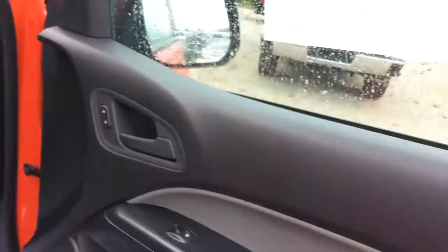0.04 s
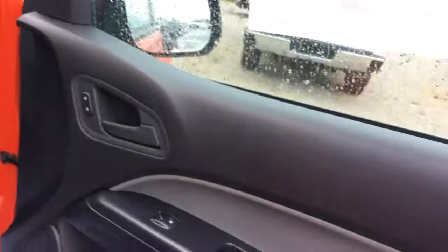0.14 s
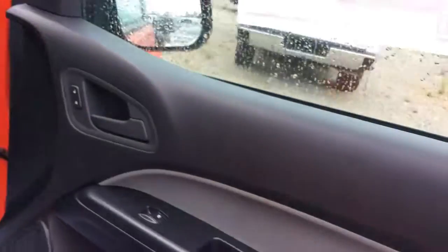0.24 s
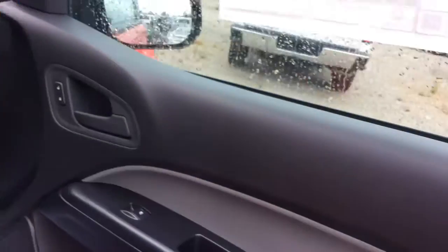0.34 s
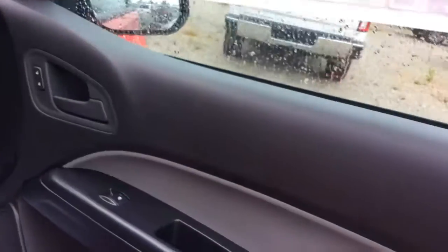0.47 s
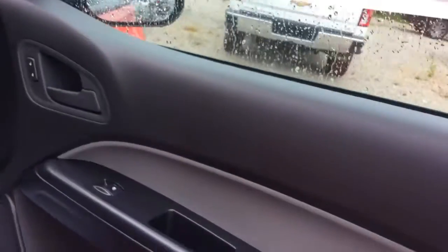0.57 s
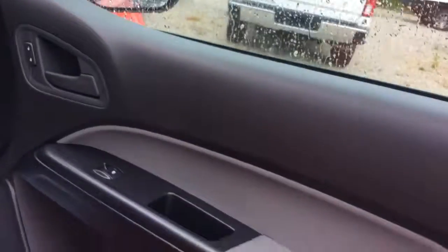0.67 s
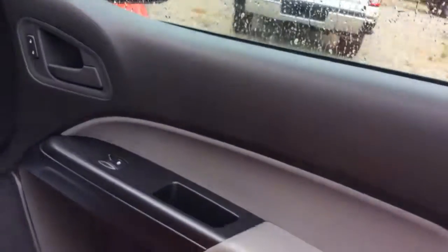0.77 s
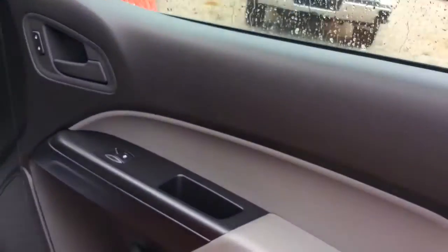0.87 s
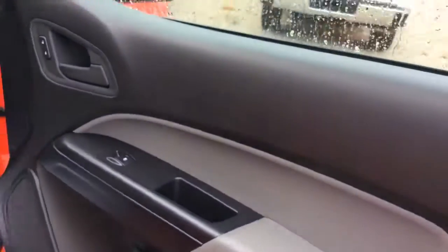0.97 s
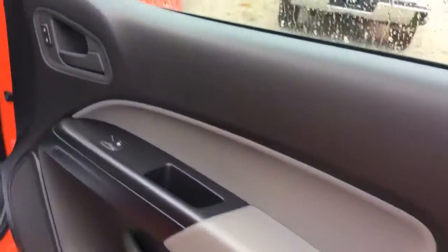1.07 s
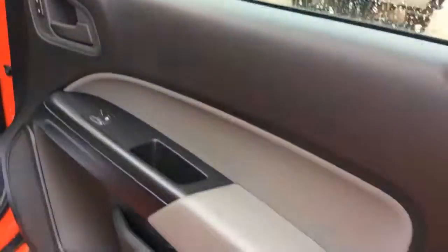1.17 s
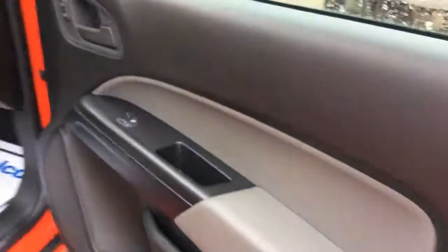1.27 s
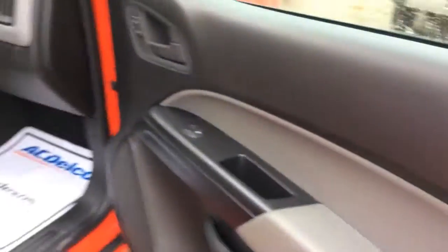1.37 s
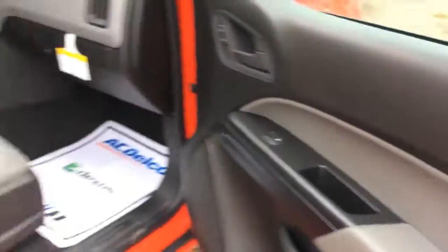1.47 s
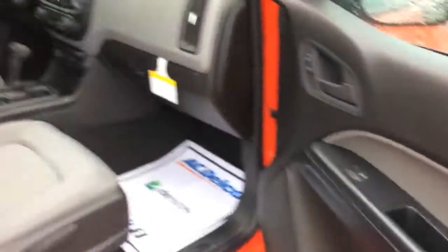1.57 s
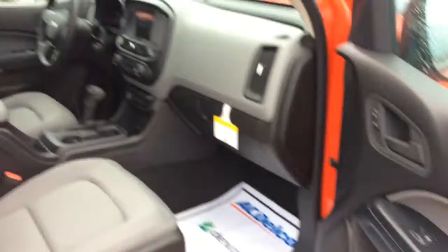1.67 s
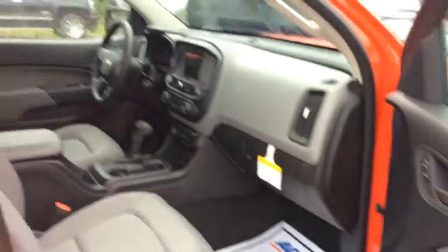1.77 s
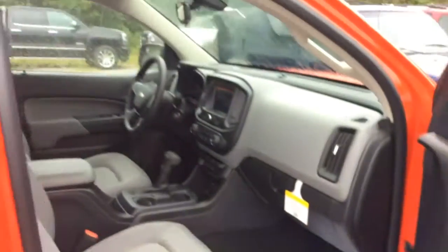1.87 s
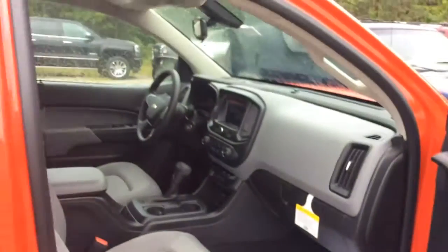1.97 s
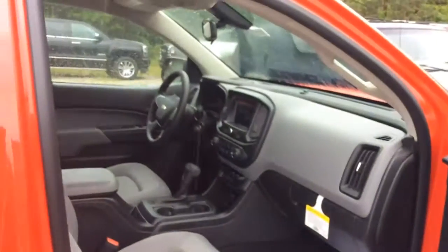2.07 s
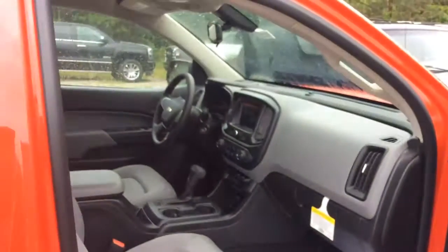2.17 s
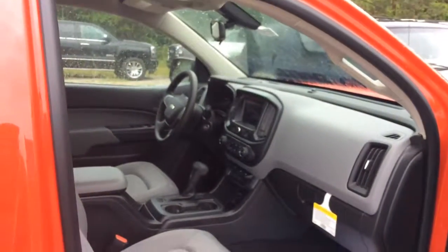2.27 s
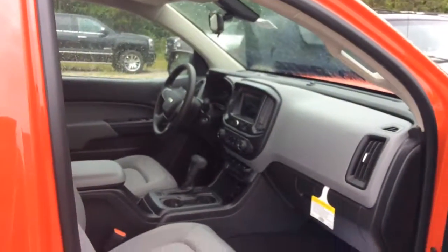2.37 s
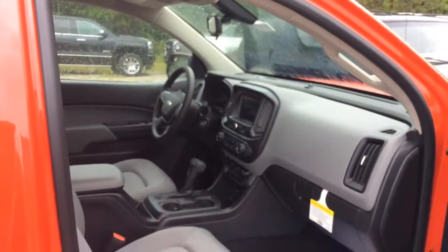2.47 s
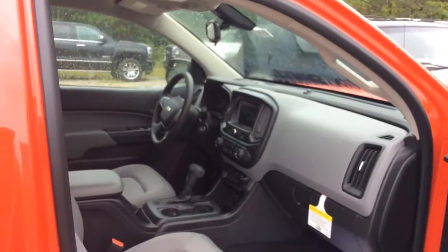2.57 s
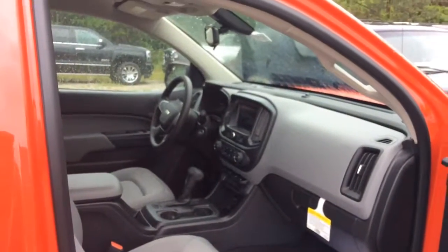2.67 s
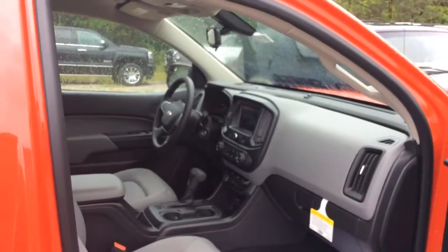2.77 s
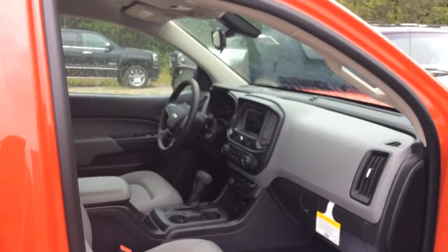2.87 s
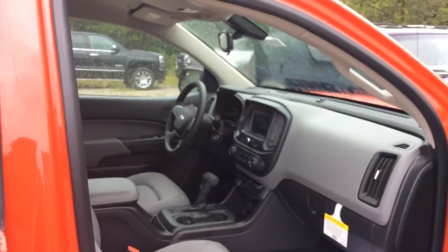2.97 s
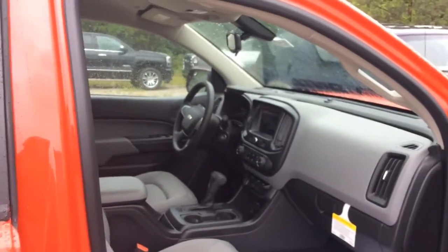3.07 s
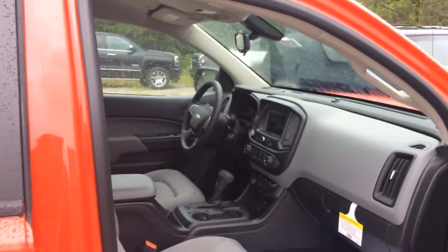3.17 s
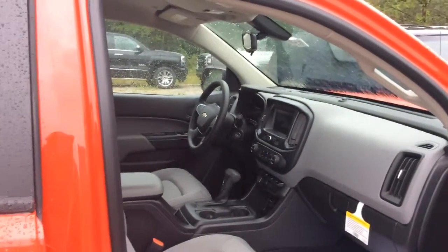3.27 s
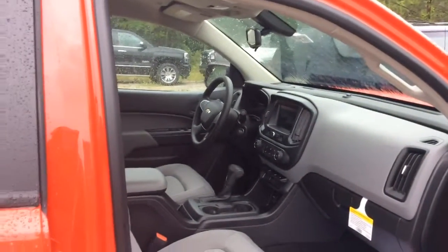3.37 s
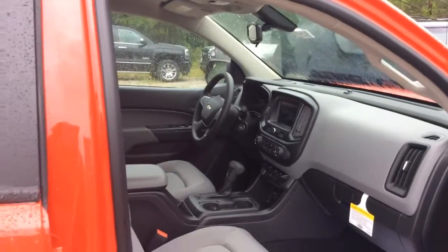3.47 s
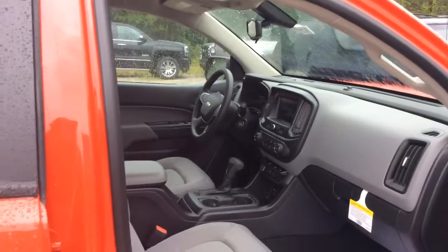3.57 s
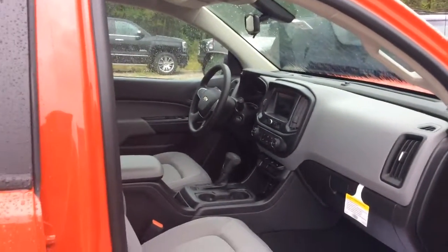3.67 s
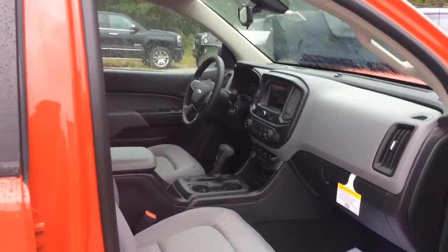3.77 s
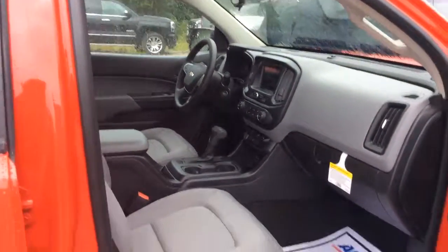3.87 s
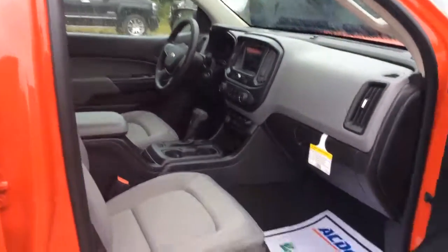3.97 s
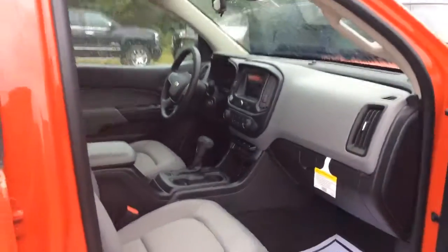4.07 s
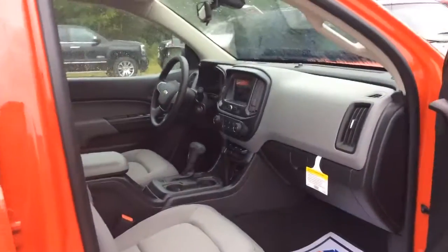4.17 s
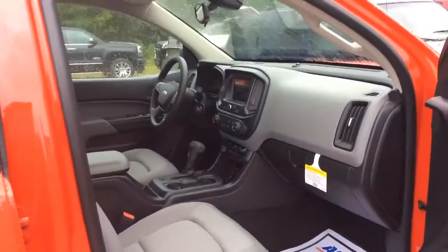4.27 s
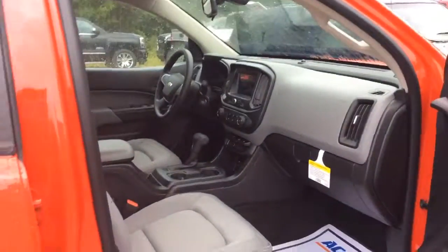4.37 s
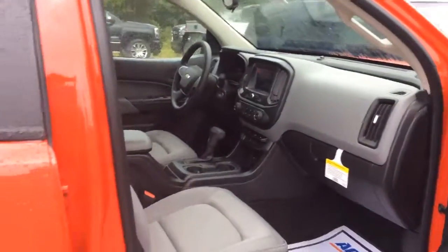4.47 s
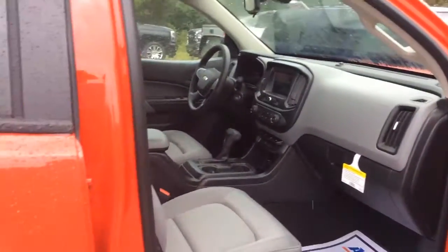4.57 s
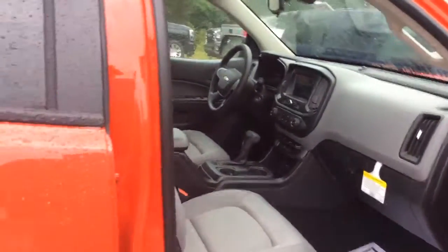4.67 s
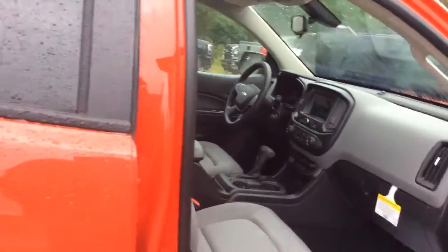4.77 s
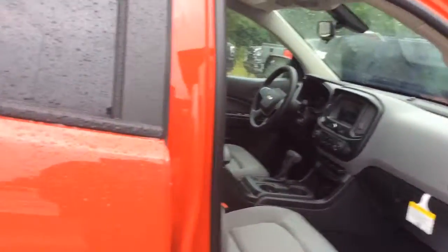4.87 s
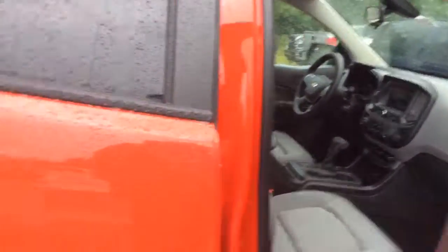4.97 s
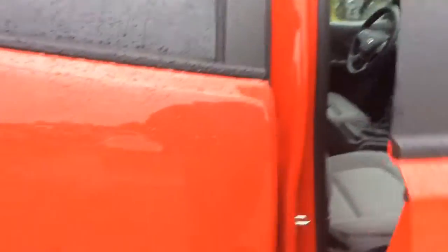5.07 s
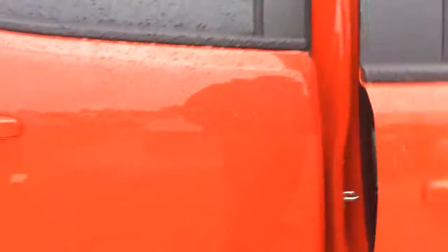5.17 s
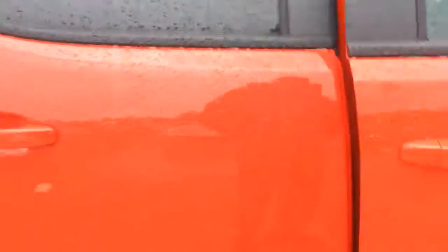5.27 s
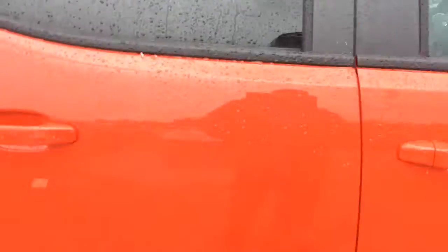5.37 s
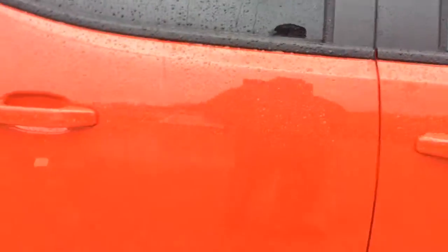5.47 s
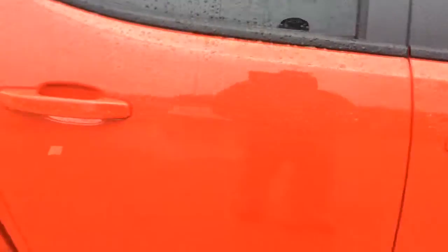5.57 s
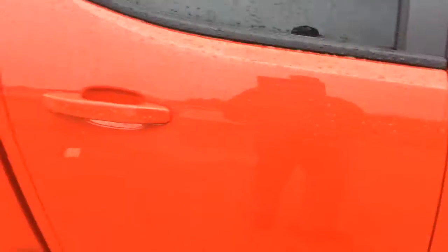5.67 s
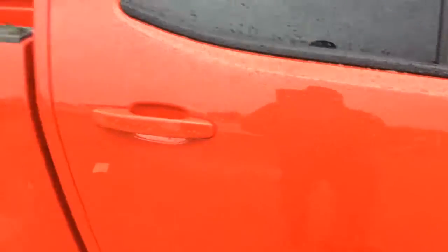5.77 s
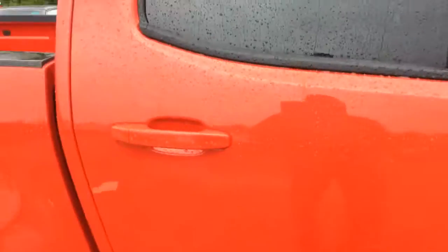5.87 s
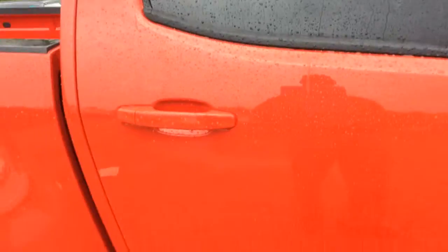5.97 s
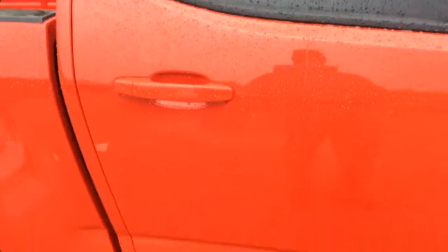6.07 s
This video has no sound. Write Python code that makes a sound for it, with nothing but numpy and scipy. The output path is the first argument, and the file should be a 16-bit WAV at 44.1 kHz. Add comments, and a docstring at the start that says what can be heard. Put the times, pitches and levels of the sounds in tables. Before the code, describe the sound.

Light rain hisses faintly outdoors and single drops tick on a pickup's body, over the low hum of distant engines. A jacket rustles near the microphone and a far bird whistles faintly. Then the open door swings: a short hinge creak, a soft knock and one wet rubber squeak. It slams shut close by with a deep thud, a steel latch snap and a brief rattle, far louder than everything else.

```python
"""A pickup's door is swung and slammed close by, in light rain.
The hinge sticks and slips, the door check knocks and wet rubber squeaks; then the door squeezes
out the air, hits its seal, latches and shudders, ringing its skin and rattling the trim.
Drops tick on the body and a jacket rustles over the low hum of far engines; a bird calls faintly."""
import sys
import numpy as np
from scipy import signal
from scipy.fft import rfft, irfft, next_fast_len
from scipy.io import wavfile

SR = 44100
rng = np.random.default_rng(int(sys.argv[2]) if len(sys.argv) > 2 else 0)


def transcribe(u):
    """Save the signal u as a 16-bit wav file named by the first command-line argument.

    u: samples, shape (n,) or (channels, n), limited to [-1, 1]; the rate is SR.
    q: integer samples, one column per channel.
    """
    v = np.clip(np.atleast_2d(u).T, -1, 1)
    q = np.round(v * 32767).astype(np.int16)
    wavfile.write(sys.argv[1], SR, q)


N = 270333
TIME = np.arange(N) / SR


def amp(db):
    return 10 ** (np.asarray(db) / 20)


def unit(x):
    """Scales to rms 1."""
    return x / np.sqrt(np.mean(x ** 2) + 1e-20)


def curve_at(points, hz):
    """Reads a curve on a log-frequency axis."""
    freqs, values = np.transpose(points)
    return np.interp(np.log(hz + 1), np.log(freqs + 1), values)


def fader(rows):
    """Gain over time from (time [s], level [dB]) rows."""
    return amp(np.interp(TIME, *np.transpose(rows)))


def add(mix, start, sound):
    """Mixes a sound in at a start time in seconds."""
    part = mix[max(round(start * SR), 0):][:len(sound)]
    part += sound[:len(part)]


def equalise(x, eq):
    """Filters by an EQ curve."""
    size = next_fast_len(len(x))
    gain = amp(curve_at(eq, np.fft.rfftfreq(size, 1 / SR)))
    return irfft(rfft(x, size) * gain, size)[:len(x)]


def noise(eq, size=N):
    """Coloured noise of rms 1."""
    return unit(equalise(rng.standard_normal(size), eq))


def wander(rate_hz):
    """Random modulation of rms 1."""
    knots = rng.standard_normal(N // 16)
    return unit(np.interp(TIME * rate_hz, np.arange(len(knots)), knots))


def resonate(x, hz, width):
    """A two-pole band-pass."""
    r = np.exp(-np.pi * width / SR)
    return signal.lfilter([1 - r, 0, r - 1], [1, -2 * r * np.cos(2 * np.pi * hz / SR), r * r], x)


def noise_band(hz, width, size=N):
    """Noise of rms 1 in a steep resonance."""
    return unit(resonate(resonate(rng.standard_normal(size), hz, 2 * width), hz, 2 * width))


def ring(modes, size=SR // 2):
    """A struck object: dying sines that start together."""
    t = np.arange(size) / SR
    return sum(amp(db - 60 * t / t60) * np.sin(2 * np.pi * hz * t) for hz, db, t60 in modes)


# engine rumble and tyre wash: (frequency [Hz], gain [dB])
RUMBLE_EQ = [(15, -18), (25, -5), (50, -2), (70, -3), (107, 2.5), (135, -4.5), (221, -6), (313, -9),
             (430, -10), (480, -14.5), (600, -17), (1000, -30.5)]
TYRE_EQ = [(200, -22), (550, -0.5), (1100, 2), (1700, -4.5), (2600, -14), (5000, -21)]
# their fader rides: (time [s], level [dB])
RUMBLE_FADER = [(0, -55), (1.7, -55), (2.5, -55.5), (3.5, -57), (4.2, -59.5), (4.7, -56), (5.3, -52),
                (6.13, -57.5)]
TYRE_FADER = [(0, -70), (1, -65.5), (2.1, -65.5), (2.8, -64.5), (3.6, -64), (4.5, -67.5), (5.55, -63.5),
              (5.75, -58.5), (6.13, -60.5)]
# engine drones: (pitch [Hz], width [Hz], level [dB], start [s], end [s])
DRONES = [(108.1, 12, -61, -0.5, 5.5), (154.7, 5.1, -60.5, 0.34, 1.405), (228, 14, -64.5, 2.05, 2.95),
          (266, 18.6, -66, 0, 6.13), (407.7, 24, -64.5, -1.5, 6.13)]

def traffic(fade_s=0.14):
    """Far engines drone in a bed of rumble and tyre noise."""
    out = fader(RUMBLE_FADER) * noise(RUMBLE_EQ) + fader(TYRE_FADER) * noise(TYRE_EQ)
    for hz, width, db, start, end in DRONES:
        fade = np.clip(1 + np.minimum(TIME - start, end - TIME) / fade_s, 0, 1)
        out += amp(db) * fade * noise_band(hz, width)
    return out


def idling_engine(firing_hz=105.2, level_db=-61, waver=0.02545, throb_db=2.0):
    """An engine idles some way off; its firing tone wavers and throbs."""
    cycles = np.cumsum(firing_hz * (1 + waver * wander(21))) / SR
    throb = amp(throb_db * wander(12))
    return amp(level_db) * unit(np.sin(2 * np.pi * cycles) * throb)


# bird call: (time [s], length [s], start pitch [Hz], end pitch [Hz], level [dB])
BIRD_NOTES = [(3.034, 0.12, 2580, 2730, -71), (3.26, 0.047, 2500, 3250, -70),
              (3.336, 0.1, 2450, 3050, -69.5), (3.545, .05, 2820, 3250, -69),
              (3.658, 0.063, 2800, 3050, -70)]

def bird(waver=0.035, flutter_db=3):
    """A far bird's thin rising whistles waver and flutter."""
    out = np.zeros(N)
    for start, length, start_hz, end_hz, db in BIRD_NOTES:
        progress = np.linspace(0, 1, round(length * SR))
        glide_hz = start_hz + (end_hz - start_hz) * np.sin(np.pi / 2 * progress)
        hz = glide_hz * (1 + waver * wander(198)[:len(progress)])
        whistle = np.sin(2 * np.pi * np.cumsum(hz) / SR)
        add(out, start, amp(db) * np.sin(np.pi * progress) * whistle)
    return out * amp(flutter_db * wander(80))


# far rain's hiss: (frequency [Hz], gain [dB]), and its level
RAIN_EQ, RAIN_DB = [(800, 8), (2500, 7.5), (7000, -4), (10000, -2.5), (15000, -8.5)], -71

def drizzle(drops_per_s=35, ticks_db=-73.5, size_db=4.0, width_hz=4500):
    """Tiny drops tick dryly at many pitches over the even hiss of far rain."""
    sizes = amp(size_db * np.minimum(rng.exponential(1, N), 4))
    impacts = sizes * (rng.random(N) < drops_per_s / SR)
    pitches = np.geomspace(6000, 13500, num=8)
    spot = rng.integers(0, len(pitches), N)
    ticks = sum(resonate(impacts * (spot == k), hz, width_hz) for k, hz in enumerate(pitches))
    return amp(ticks_db) * unit(ticks) + amp(RAIN_DB) * noise(RAIN_EQ)


# close drops: (time [s], level [dB], pitch [Hz], t60 [s], panel tap gain [dB])
DROPS = [(.543, -41.5, 3700, 0.054, -27), (.6385, -46.5, 7600, 0.027, -21), (0.776, -47, 2670, 0.03, -2),
         (.803, -52, 8700, 0.028, -29), (0.8728, -47, 5300, 0.043, -21), (1.051, -50, 11500, .03, -16),
         (1.2416, -46.5, 8360, 0.054, -6), (1.281, -44.5, 8400, 0.062, -18), (1.528, -54, 8500, .033, -6),
         (1.613, -43, 5100, .043, -4), (1.72, -46, 6250, 0.033, -1), (1.817, -47, 4030, .04, -1),
         (1.9435, -51, 3220, 0.048, -16), (1.9855, -54, 11000, .015, -20), (2.028, -52, 9500, 0.013, -20),
         (2.3225, -55, 10500, .012, -20), (2.476, -58.5, 8300, .05, 1), (3.429, -51.5, 8000, 0.042, -23),
         (3.5192, -49.5, 5700, 0.044, -19), (3.617, -46.5, 8440, 0.012, 0), (3.669, -48.5, 10200, .042, -5),
         (4.8435, -53, 7100, 0.045, 3.5), (6.0449, -38, 6900, 0.033, -7)]

def drops(width_share=0.15, splash_db=1, splash_t60=0.0077, tap_hz=1300, tap_width_hz=700):
    """Each near drop is a short splash, a bright ping and a duller tap of the panel under it."""
    out, t = np.zeros(N), np.arange(SR // 8) / SR
    for start, db, hz, t60, tap_db in DROPS:
        splash_noise, ping_noise, tap_noise = rng.standard_normal((3, len(t)))
        splash = splash_noise * amp(splash_db - 60 * t / splash_t60)
        ping = unit(resonate(ping_noise, hz, hz * width_share))
        tap = amp(tap_db) * unit(resonate(tap_noise, tap_hz, tap_width_hz))
        add(out, start, amp(db) * (splash + (ping + tap) * amp(-60 * t / t60)))
    return out


def strokes(rows, release_db_per_s):
    """Envelope of rubbing strokes: each rises, holds and dies away."""
    power = np.zeros(N)
    for start, length, db, attack in rows:
        rise = np.clip((TIME - start) / attack, 0, 1)
        release_db = release_db_per_s * np.maximum(TIME - start - length, 0)
        power += (rise * amp(db - release_db)) ** 2
    return np.sqrt(power)


# cloth rustle and sleeve swish: (frequency [Hz], gain [dB])
CLOTH_EQ = [(150, -4), (350, 4), (700, 3.5), (1200, -1.5), (2200, -4.5), (3800, -1), (5500, 0.5),
            (8000, -4), (11000, -8.5), (15000, -11)]
SLEEVE_EQ = [(500, 0.5), (1200, 1), (2500, -5), (5000, -3.5), (7500, 0), (9000, 1), (12000, -1),
             (15000, -2.5)]
# their cues: (time [s], length [s], level [dB], attack [s])
CLOTH_RUBS = [(0.247, .08, -55.5, .012), (0.32, .125, -52, .03), (0.868, .14, -52, .012),
              (1.1, .34, -59.5, .05), (1.437, .02, -53, .012), (1.606, .075, -48.5, .008),
              (1.74, .08, -63, .03), (4.95, .09, -57, .06), (5.1, .15, -67, .05), (5.65, .3, -58, .07),
              (5.98, .15, -63, .03)]
SLEEVE_SLIDES = [(3.62, .72, -60.5, .55), (4.42, .36, -50.3, .2), (4.98, .2, -66, .05),
                 (5.64, .17, -60, .14)]

def jacket(grain_db=2.2, catch_db=3.2, rest_db=-84):
    """Cloth rubs in fine grains and catches now and then; the sleeve slides smoothly."""
    grains = rng.standard_normal(N) * amp(grain_db * wander(900) + catch_db * wander(70))
    rubbing = np.hypot(strokes(CLOTH_RUBS, release_db_per_s=95), amp(rest_db))
    sliding = strokes(SLEEVE_SLIDES, release_db_per_s=130)
    return rubbing * unit(equalise(grains, CLOTH_EQ)) + sliding * noise(SLEEVE_EQ)


# scuff cues: (time [s], length [s], level [dB], centre [Hz], width [Hz])
SCUFFS = [(0.26, .21, -55.5, 650, 604), (0.328, 0.14, -47.5, 3700, 1490), (1.071, 0.037, -54.5, 1270, 220),
          (1.255, .05, -52, 1300, 278), (1.435, 0.038, -55, 1200, 885), (1.611, 0.08, -51, 443, 400),
          (4.02, 0.023, -55, 3830, 500), (4.013, .036, -44, 1520, 800), (4.594, .04, -54, 4530, 510),
          (4.667, 0.013, -53, 1800, 2500), (5.336, .014, -45, 1950, 400), (5.458, 0.025, -52, 4100, 2920),
          (5.66, 0.22, -61, 1210, 784), (5.821, 0.21, -56, 1200, 680), (6.025, .025, -51.5, 6240, 2200)]

def scuffs(grit_db=3):
    """Hand, shoe and door make brief gritty rubs, each through one resonance."""
    out = np.zeros(N)
    for start, length, db, hz, width in SCUFFS:
        arch = np.sin(np.linspace(0, np.pi, round(length * SR)))
        add(out, start, amp(db) * arch * noise_band(hz, width, len(arch)))
    return out * unit(amp(grit_db * wander(250)))


def cab_reflections(x, wet_db=-13, t60=0.093):
    """The open cab adds a short spray of reflections."""
    t = np.arange(SR // 5) / SR
    tail = rng.standard_normal(len(t)) * amp(-60 * t / t60) * (t > .003)
    return x + amp(wet_db) * signal.oaconvolve(x, tail / np.linalg.norm(tail))[:N]


def hinge_chatter(start=4.0, length=.052, slips_per_s=260, level_db=-44, jitter=.25, spread_db=3):
    """Weak slips at an uneven pace, as (time [s], level [dB]) rows."""
    chance = rng.standard_normal((round(length * slips_per_s), 2))
    return [(start + (k + jitter * late) / slips_per_s, level_db + spread_db * force)
            for k, (late, force) in enumerate(chance)]


# the creak's strong slips: (time [s], level [dB])
HINGE_SLIPS = [(3.9940, -35), (3.9983, -22.5), (4.0208, -32), (4.0237, -33), (4.0318, -31), (4.0387, -30),
               (4.0432, -29.5)]
# the hinge's ring: (frequency [Hz], gain [dB], t60 [s])
HINGE_MODES = [(433, -17, 0.035), (790, -14.5, 0.022), (1200, -17, 0.019), (1720, -15, .025),
               (3440, -21, 0.028), (6000, -30, 0.024)]

def hinge(scatter=0.11, pulse_hz=1300, pulse_s=.0005, attack_s=0.00026):
    """The hinge sticks and slips: each slip is one rounded pulse and a faint ring, never quite alike."""
    out, t = np.zeros(N), np.arange(SR // 10) / SR
    attack = 1 - np.exp(-t / attack_s)
    centred = t - t.mean()
    bell_curve = np.exp(-.5 * (centred / pulse_s) ** 2)
    for start, slip_db in HINGE_SLIPS + hinge_chatter():
        detune = 1 + scatter * rng.standard_normal(len(HINGE_MODES))
        modes = [(hz * ratio, db, t60) for (hz, db, t60), ratio in zip(HINGE_MODES, detune)]
        pulse = bell_curve * np.sin(2 * np.pi * pulse_hz * detune[0] * centred)
        add(out, start, amp(slip_db) * ring(modes, len(t)) * attack)
        add(out, start - t.mean(), amp(slip_db) * pulse)
    return out


# the squeak's tone: (harmonic [number], gain [dB])
SQUEAK_HARMONICS = [(1, 0.5), (2, -27), (3, -24.5), (4, -34)]

def rubber_squeak(start=4.7565, length=.0235, level_db=-22, start_hz=845, sag_hz_per_s=6500):
    """Wet rubber gives one falling chirp, which the cab returns twice."""
    out, t = np.zeros(N), np.arange(0, length, 1 / SR)
    phase = 2 * np.pi * np.cumsum(start_hz - sag_hz_per_s * t) / SR
    arch = np.sin(np.pi * t / length) ** 1.5
    chirp = arch * sum(amp(db) * np.sin(k * phase) for k, db in SQUEAK_HARMONICS)
    for delay_s, gain_db in [(0, 0), (.0175, -14), (.033, -22)]:
        add(out, start + delay_s, amp(level_db + gain_db) * chirp)
    return out


# whoosh ahead of the slam: (frequency [Hz], gain [dB])
AIR_EQ = [(30, -8), (70, -2), (250, -14), (480, 6), (750, -3), (1400, -8), (2100, -11.5), (3500, -21),
          (8000, -36), (15000, -42)]

def squeezed_air(shut_s=5.358, peak_db=-24.5, swell_s=.014, gap_power=2.4, cutoff_db_per_s=2000):
    """Air swells ever faster through the narrowing gap and is cut off by the seal."""
    gap = 1 + np.maximum(shut_s - TIME, 0) / swell_s
    cutoff_db = cutoff_db_per_s * np.maximum(TIME - shut_s, 0)
    return amp(peak_db - cutoff_db) / gap ** gap_power * noise(AIR_EQ)


# latch snaps: (time [s], level [dB], t60 [s])
LATCH_SNAPS = [(5.3609, -32, 0.033), (5.3640, -23, 0.035), (5.3718, -42, 0.06), (5.389, -43, 0.066)]
# their steely edge: (frequency [Hz], gain [dB])
STEEL_EQ = [(500, -20), (2000, -1), (4000, 2.5), (6500, -5), (9000, -2), (12000, -6.5), (15000, -12)]
# the latch's ring: (frequency [Hz], gain [dB], t60 [s])
LATCH_MODES = [(1240, -3, 0.084), (1903, -15, 0.084), (2064, 1.5, 0.069), (2190, -12, 0.076),
               (2370, -22, 0.11), (3250, -10, 0.078), (8780, -13, 0.11)]

def latch(ring_db=-4):
    """The steel latch snaps home: bright bursts, each with a metallic ring."""
    out, t = np.zeros(N), np.arange(SR // 2) / SR
    for start, db, t60 in LATCH_SNAPS:
        burst = amp(db - 60 * t / t60) * noise(STEEL_EQ, len(t))
        add(out, start, burst + amp(db + ring_db) * ring(LATCH_MODES))
    return out


# rattle of latch, glass and trim: (frequency [Hz], gain [dB])
CLATTER_EQ = [(60, -26), (300, 1), (700, -1), (950, -8), (1250, 1.5), (1600, -4.5), (2050, 0), (2800, -7),
              (4500, -20), (7000, -19.5), (10000, -18), (15000, -29)]
# its decay: (frequency [Hz], t60 [s])
CLATTER_DECAY = [(100, 0.26), (700, 0.16), (2000, 0.11), (5000, 0.13), (15000, 0.07)]

def clatter(size=SR // 3):
    """Countless loose parts ring after a blow; the treble dies first."""
    hz, t, spectrum = signal.stft(noise(CLATTER_EQ, size), SR, nperseg=256)
    decay = amp(-60 * t / curve_at(CLATTER_DECAY, hz)[:, None])
    return signal.istft(spectrum * decay, SR, nperseg=256)[1]


# the boom of door skin and cab: (frequency [Hz], gain [dB], t60 [s])
DOOR_MODES = [(59, 1.5, 0.27), (77.2, -4.5, .24), (116.5, -13, 0.4), (143, -14.5, 0.48), (160.4, -10, 0.27),
              (194.6, -14, 0.35), (231, 4, 0.12), (255.6, -13, .27), (286.5, -8, 0.27), (333, 0, .1),
              (353, -10.5, 0.15), (414, -11.5, 0.19), (502, 3.5, 0.046), (542.4, -6, 0.12),
              (610, -10.5, .11), (780, -9, 0.077), (811, -12.5, 0.094), (1121, 1, 0.044), (1148, -8, 0.1),
              (1246, -4, 0.052), (1490, -3, 0.095)]
# the check knocks and lets go; seal, frame and striker hit; the door rebounds and shudders:
# (time [s], ring level [dB], centre [Hz], spread [octaves], clatter level [dB])
DOOR_BLOWS = [(4.306, -39, 408, 1.2, -55.5), (4.312, -33, 267, 0.2, -64), (4.3230, -31, 368, 0.24, -70),
              (4.3445, -37, 720, 0.27, -68), (5.2647, -40.5, 422, 0.96, -48.5),
              (5.3485, -31, 349, 1.27, -37), (5.3585, -7, 122.6, 0.52, -22), (5.3616, -9.5, 642, 0.49, -29),
              (5.3822, -24.5, 165, 0.93, -48), (5.3862, -19, 265, 0.89, -27), (5.3974, -18, 181, 1, -38),
              (5.4231, -17.5, 324, .27, -48), (5.4383, -41, 539, 0.74, -48.5),
              (5.4913, -41, 223, 0.43, -58)]

def door(contact_s=0.00064):
    """Each blow rings the door's modes near its own pitch and shakes the trim."""
    out, t = np.zeros(N), np.arange(SR // 2) / SR
    attack = 1 - np.exp(-t / contact_s)
    for start, ring_db, centre_hz, spread, clatter_db in DOOR_BLOWS:
        excited = [(hz, db - 4 * (np.log2(hz / centre_hz) / spread) ** 2, t60)
                   for hz, db, t60 in DOOR_MODES]
        add(out, start, amp(ring_db) * ring(excited) * attack)
        add(out, start, amp(clatter_db) * clatter())
    return out


def scene():
    """The door and its close details over the outdoor bed, in mono."""
    hits = door() + latch() + squeezed_air()
    details = cab_reflections(hinge() + drops()) + rubber_squeak() + scuffs() + jacket()
    bed = drizzle() + traffic() + idling_engine() + bird()
    return (hits + details + bed)[None]


# microphone colour: (frequency [Hz], gain [dB])
MIC_EQ = [(20, -18), (35, -13), (50, -1.5), (7800, -2), (8200, 4.5), (8800, 1), (10000, -2), (12000, -5),
          (16000, -7.5)]

def record(dry):
    """The microphone's bass roll-off and treble peak, then a steep low-pass."""
    low_pass = signal.firwin(1023, cutoff=15600, window=("kaiser", 9), fs=SR)
    return signal.oaconvolve(equalise(dry[0], MIC_EQ), low_pass, "same")[None]


dry = scene()
out = record(dry)
transcribe(out)
```